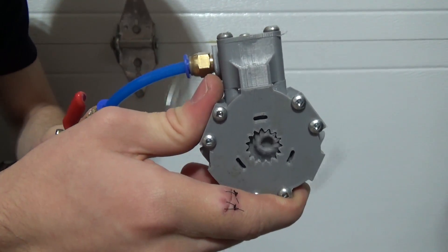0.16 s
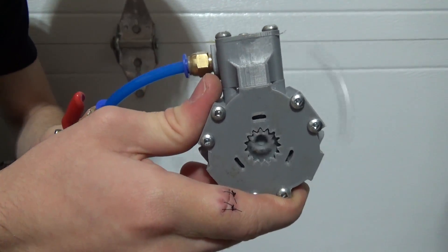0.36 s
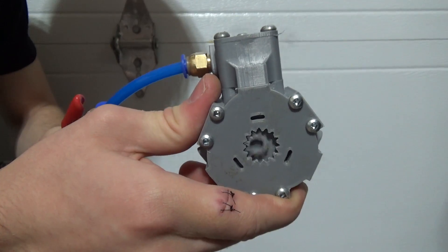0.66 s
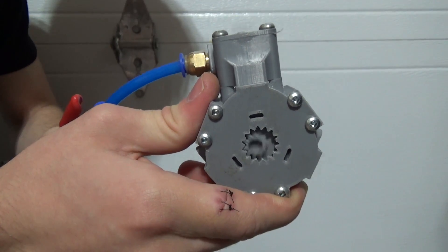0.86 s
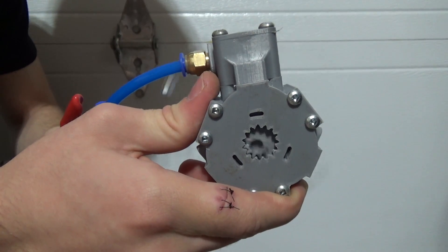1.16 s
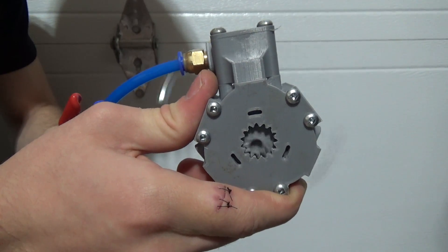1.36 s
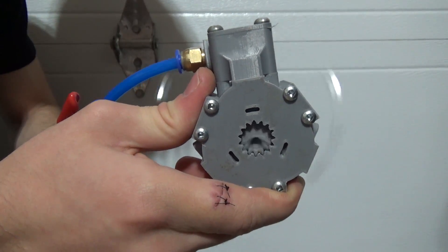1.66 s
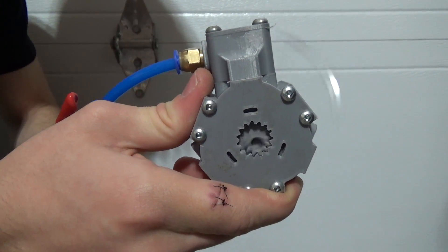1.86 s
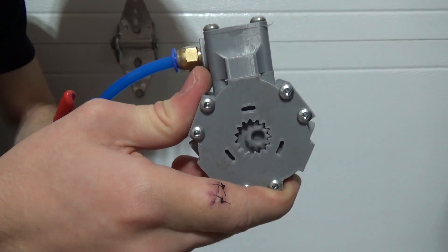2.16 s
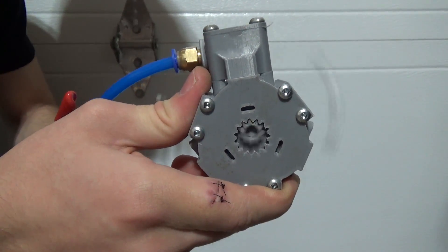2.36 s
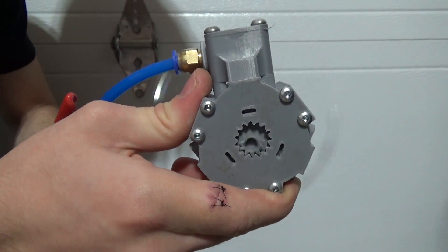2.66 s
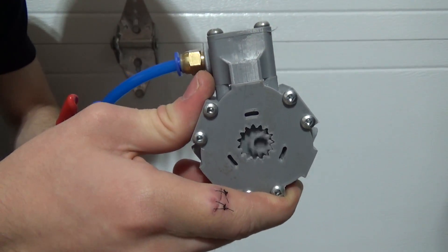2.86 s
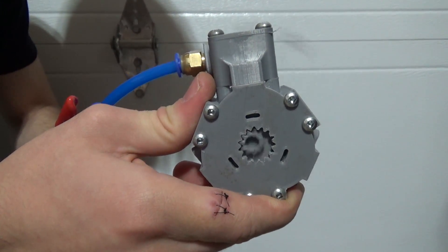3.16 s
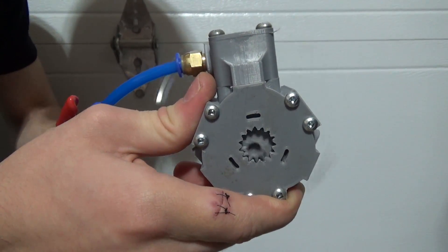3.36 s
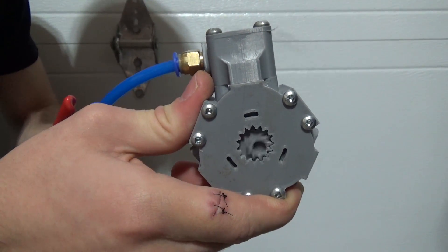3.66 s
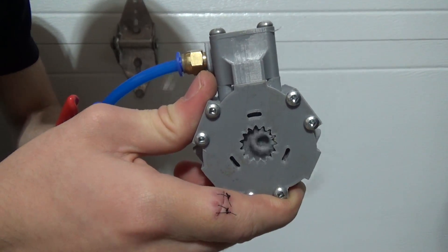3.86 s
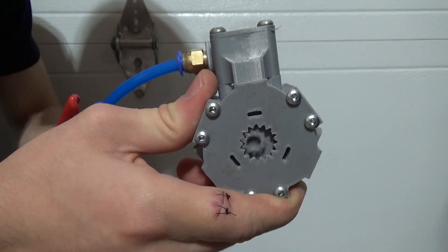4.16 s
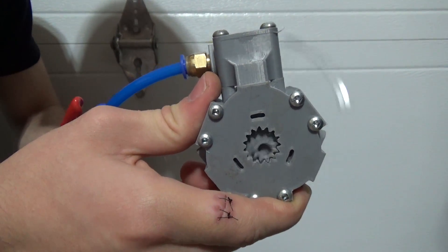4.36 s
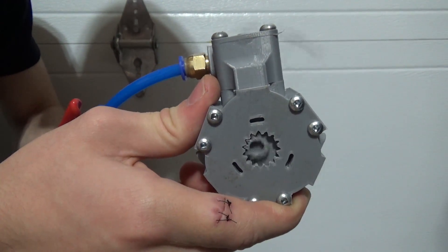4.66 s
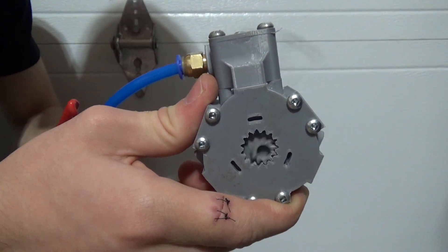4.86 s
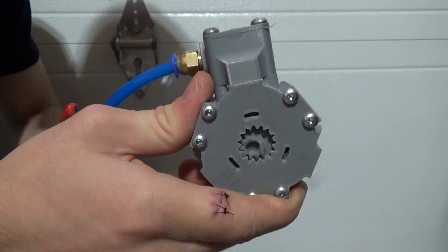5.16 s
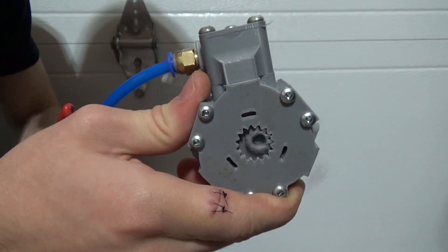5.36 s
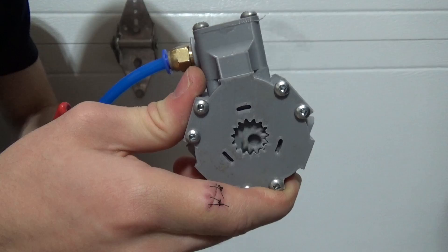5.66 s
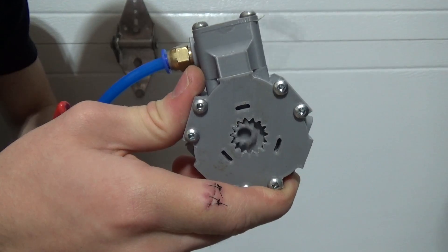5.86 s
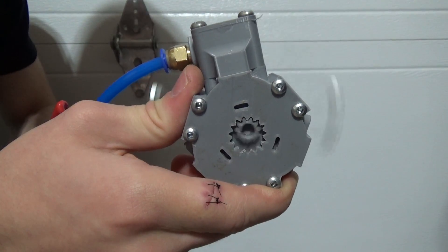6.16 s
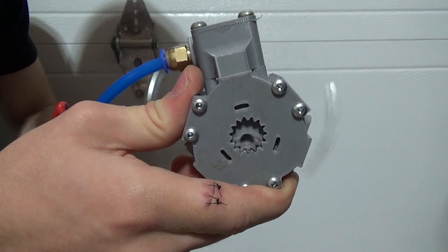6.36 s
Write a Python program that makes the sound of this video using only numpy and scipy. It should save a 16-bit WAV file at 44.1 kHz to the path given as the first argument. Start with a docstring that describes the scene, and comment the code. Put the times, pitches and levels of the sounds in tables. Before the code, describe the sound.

A small plastic rotary engine is already running on compressed air at 0 s, very close and dry. Abrupt hissing puffs follow at nearly nine a second, each lasting about half its cycle with snappy edges. They alternate: one opens with a brief raspy, hollow hoot sagging from about 700 to 550 Hz, the next is a brighter hiss. Between them thin high air leaks, hard plastic ticks and chatters around 3 kHz, and a soft rumble rolls underneath. The pace reaches nearly ten by 1-1.7 s, drops towards 8.4 at 3 s, climbs past nine at 3.75 s, then slows to about seven at 5.9 s, picking up slightly before the cut at 6.5 s. Small spits come near 0.5-1, 3.4-3.8 and 5-5.4 s; dull knocks scatter from 0.9 to 5 s, strongest near 2.2 s. Leakage swells around 2 s. Faint room noise and echo.

```python
"""A small printed-plastic rotary engine, held in the hand, idles on compressed air; its speed wanders and drops.
Two unlike exhaust puffs alternate, both jets of coloured noise gated by the port: the first starts with
a hollow honk, a gliding sine with rasp, and the second is a brighter hiss.
Between them filtered noise leaks past the rotor, whose random slips chatter and ring the housing;
it also ticks, rumbles, spits and now and then knocks, over quiet room noise and a faint echo."""
import sys
import numpy as np
from scipy import signal
from scipy.fft import rfft, irfft, next_fast_len
from scipy.io import wavfile
from scipy.ndimage import map_coordinates

SR = 44100
rng = np.random.default_rng(int(sys.argv[2]) if len(sys.argv) > 2 else 0)


def wav_out(sig):
    """Save sig, one row per channel (or a flat mono array), as 16-bit PCM at SR to the path in sys.argv[1]."""
    wavfile.write(sys.argv[1], SR, np.round(np.clip(np.atleast_2d(sig).T, -1, 1) * 32767).astype(np.int16))


N = 287532  # length [samples]

# Engine speed: (time [s], rate [puffs/s])
ENGINE_SPEED = [(0.0, 8.838), (0.866, 9.702), (1.709, 9.77), (2.467, 8.688), (2.961, 8.425), (3.747, 9.266),
                (4.598, 7.91), (5.916, 7.218), (6.5, 7.64)]
# Port timing [puff cycles]: wait for the first opening, time open, head start of every second puff
FIRST_OPENING, OPEN_SHARE, SECOND_EARLY = .1348, .454, .0283
# Puffs whose hollow note fails to speak: (puff number, counted from 0)
MUTE_PUFFS = [2, 20]

# Room noise colour: (frequency [Hz], relative density [dB per Hz])
ROOM_COLOUR = [(20, -27), (60, -9), (150, 0), (400, -5), (1500, -18), (15000, -35)]
# Air seeping past the seals as they loosen and reseat, before trim: (time [s], level [dB])
SEAL_SEEPAGE = [(0.0, -29.5), (0.51, -33.5), (1.17, -30.5), (1.48, -33), (1.86, -26), (1.97, -29.5),
                (2.2, -25), (2.3, -30.2), (2.54, -28), (3.17, -34.5), (3.6, -34), (3.84, -28), (4.08, -28),
                (4.82, -28.5), (5.07, -32.5), (5.43, -29), (5.51, -32), (6.5, -31.7)]
# Colour of the steady seep, and of the chatter's clicks: (frequency [Hz], relative density [dB per Hz])
SEEP_COLOUR = [(300, -28.5), (1100, -15.5), (1700, -9), (2900, -3), (4400, -3), (5300, -9), (6300, -1),
               (7400, -8.5), (8900, -6), (10250, 1.5), (11100, -6.5), (12100, -5.5), (13800, -19),
               (15700, -8.5)]
# Colour of the faster leak near the port: (frequency [Hz], relative density [dB per Hz])
LEAK_COLOUR = [(1000, -23), (3000, -35.5), (4400, -9), (5100, -7), (5800, 2), (7400, 4), (8100, 5),
               (9500, 8.5), (11500, -19), (12700, -7), (14500, -2), (15600, 0.5)]
# The rotor rubs at the same places of every turn: (share of the pause gone [0-1], level [dB])
RUBBING_PLACES = [(0, -47), (.2, -31.5), (.29, -33.5), (.35, -44), (.45, -35.5), (.62, -45), (.76, -29.5),
                  (.84, -29.5), (1, -26)]
# Ring of the plastic housing: (frequency [Hz], width [Hz], relative level [dB])
HOUSING_MODES = [(2667, 137, 8.5), (3190, 510, 2), (3600, 1440, -5.5)]
# Rolling load over a pair of puffs, before lumps:
# (place [0-1 first puff, 1-2 pause, 2-3 second puff, 3-4 pause], level [dB])
ROLLING_LOAD = [(0, -75), (.55, -77), (.8, -51), (1.05, -52.5), (1.35, -56.5), (1.48, -56), (1.75, -57.5),
                (2.5, -78), (3.2, -59), (4, -72)]
# Dull knocks of the rotor, before trim: (time [s], peak level [dB])
ROTOR_KNOCKS = [(0.917, -34), (1.121, -36), (1.326, -40), (1.741, -40), (2.194, -22.5), (2.605, -33),
                (2.891, -39), (3.766, -41), (3.971, -33), (4.23, -40), (4.497, -35), (4.741, -29.5),
                (4.95, -37)]
# Colour of knocks and rumble: (frequency [Hz], relative density [dB per Hz])
KNOCK_COLOUR = [(25, -44), (50, -20), (100, -2), (170, 0), (300, 0), (480, -11), (1000, -30), (3000, -60)]
# Part of the rumble that differs between the ears: (frequency [Hz], relative density [dB per Hz])
SWAY_COLOUR = [(30, -38), (60, -22), (120, -7), (300, -4), (550, -5), (1000, -9), (3000, -47)]
# Decay of the walls' answer: (frequency [Hz], fall by 60 dB [s])
GARAGE_DECAY = [(100, 0.55), (1000, 0.11), (5000, 0.7), (15000, 0.6)]
# Colour of the air jets: (frequency [Hz], relative density [dB per Hz])
JET_COLOUR = [(100, -63), (300, -23), (550, -17), (1200, -15), (1600, -8), (2400, -4), (3700, -1),
              (5100, -1), (6100, 3.5), (7500, 0), (9400, 2.5), (11200, -2.5), (13000, -5), (16000, -7)]
# Air resonances that come and go as the rotor sweeps the port, before random variation:
# (frequency [Hz], width of one pass [Hz], level in first puff [dB], level in second puff [dB],
#  strongest moment [share of puff], spread [share of puff])
CAVITY_MODES = [(613, 304, -37.5, -48.5, 0.11, 0.3), (2560, 300, -28, -33.5, 0.3, 0.13),
                (2870, 130, -26.5, -70, 0.2, 0.13), (2304, 180, -36, -36.5, 0.72, 0.19),
                (4453, 440, -31.5, -31.5, 0.58, 0.34), (6690, 1000, -30, -23, 0.27, 0.25),
                (8046, 640, -26.5, -24, 0.27, 0.36), (10070, 1430, -21.5, -21.5, 0.78, 0.16),
                (15000, 900, -38, -32.5, 0.16, 0.28)]
# Colour of the kicks and eddies at the port edges: (frequency [Hz], relative density [dB per Hz])
SLAP_COLOUR = [(30, -32), (100, -25), (200, -4), (350, 4), (700, 4.5), (2000, -1), (5000, -7.5),
               (15000, -35)]
# Colour of a hard plastic tick: (frequency [Hz], relative density [dB per Hz])
TICK_COLOUR = [(200, -26), (700, -12), (1800, 2), (3600, 7.5), (6000, -1), (10000, -5), (15000, -13)]
# The seal lets go for an instant, before trim: (time [s], peak level [dB])
SEAL_SPITS = [(0.532, -17), (0.7447, -12), (0.9512, -12), (3.3556, -11), (3.576, -13), (3.7936, -18),
              (5.02, -19), (5.401, -15)]

# Balance of the two capsules, left minus right: (frequency [Hz], level [dB])
CAPSULE_BALANCE = [(2000, 0), (5300, -.1), (6300, -1.4), (7900, 0), (9000, -2.3), (10400, -1.3),
                   (12000, -.1)]
# The left capsule's lead: (frequency [Hz], phase [radians])
CAPSULE_LEAD = [(7400, 0), (8400, -.2), (10100, .1), (12000, 0)]
LOW_CUT_HZ, TOP_HZ = 38, 15900


def amp(db):
    """Decibels to gain."""
    return 10 ** (np.asarray(db) / 20)


def unit(x):
    """Scale to rms 1."""
    return x / np.sqrt(np.mean(x ** 2) + 1e-20)


def clock():
    """Time of every sample, in seconds."""
    return np.arange(N) / SR


def along(points, hz):
    """Read (Hz, value) points on a log frequency axis."""
    f, value = np.transpose(points)
    return np.interp(np.log(hz + 1), np.log(f + 1), value)


def filtered(x, response):
    """Shape x by a response of frequency."""
    m = next_fast_len(N + SR // 2)
    spectrum = rfft(x, m) * response(np.fft.rfftfreq(m, 1 / SR))
    return irfft(spectrum, m)[..., :N]


def coloured(x, spectrum):
    """Pass x through a (Hz, dB) spectrum."""
    return filtered(x, lambda hz: amp(along(spectrum, hz)))


def resonance(f, hz, width):
    """Causal response of one mode."""
    return 1j * f * width / (hz * hz - f * f + 1j * f * width)


def wobble(rate):
    """A smooth random curve, rate knots a second."""
    knots = rng.standard_normal(int(N * rate / SR) + 4)
    return map_coordinates(knots, [np.arange(N) * rate / SR])


def rush(spectrum):
    """Turbulent noise of rms 1."""
    return unit(coloured(rng.standard_normal(N), spectrum))


def blows(times, db, spectrum):
    """Single pushes with the given colour and peak levels."""
    hits, probe = np.zeros(N), np.zeros(N)
    inside = times * SR < N - 1
    hits[(times[inside] * SR).astype(int)] = amp(db)[inside]
    probe[N // 2] = 1
    return coloured(hits, spectrum) / coloured(probe, spectrum).max()


def puffs():
    """One row per puff, (port opens s, port shuts s): the rotor uncovers the port at fixed angles."""
    t = np.arange(N + SR // 2) / SR
    cycles = np.cumsum(np.interp(t, *np.transpose(ENGINE_SPEED))) / SR
    number = np.arange(int(cycles[N] - FIRST_OPENING) + 1)
    opens = FIRST_OPENING + number - SECOND_EARLY * (number % 2)
    return np.interp(np.transpose([opens, opens + OPEN_SHARE]), cycles, t)


def rotor():
    """Per sample: puff number, share of the puff gone, share of the following pause gone."""
    edges = puffs().ravel()
    step = np.interp(clock(), edges, np.arange(len(edges)))
    puff = (step // 2).astype(int)
    return puff, np.minimum(step % 2, 1), np.maximum(step % 2 - 1, 0)


def port(rise_s, fall_s):
    """How far the exhaust port is open, 0-1, with sloping edges."""
    corners = [(a - rise_s / 2, a + rise_s / 2, b - fall_s / 2, b + fall_s / 2) for a, b in puffs()]
    return np.interp(clock(), np.ravel(corners), np.tile([0, 1, 1, 0], len(corners)))


def seal_level():
    """Seepage past the seals over time, in dB."""
    return np.interp(clock(), *np.transpose(SEAL_SEEPAGE))


def slack():
    """How much looser than usual the seals are, in dB of seepage."""
    seal_db = seal_level()
    return seal_db - seal_db.mean()


def room_noise(db, side_db):
    """Quiet noise common to both ears, plus a weaker part independent at each."""
    common = rush(ROOM_COLOUR)
    sides = np.array([rush(ROOM_COLOUR), rush(ROOM_COLOUR)])
    return amp(db) * (common + amp(side_db) * sides)


def leaks(pause, opening, seep_db, leak_db, growth, lead, widening, flutter_db):
    """Air always seeps, and escapes faster as the rotor tip nears the port; slack seals leak more and sooner."""
    slack_db = slack()
    reach = lead + widening * amp(slack_db)  # share of the pause
    nearing = np.exp(-((1 - pause) / reach) ** 4)
    seep = amp(seep_db) * rush(SEEP_COLOUR)
    leak = amp(leak_db + growth * slack_db) * nearing * (1 - opening) * rush(LEAK_COLOUR)
    return (seep + leak) * amp(seal_level() + flutter_db * wobble(110))


def chatter(puff, pause, slips_per_s, scatter_db, click_db, after_second_db):
    """Where the rotor rubs it moves in tiny slips that click and ring the housing."""
    size = rng.uniform(-1, 1, N)
    happens = rng.random(N) < slips_per_s / SR
    slips = happens * np.sign(rng.standard_normal(N)) * amp(scatter_db * size)

    def housing(f):
        """Sum of the housing's modes with alternating signs."""
        modes = enumerate(HOUSING_MODES)
        return sum((-1) ** k * amp(db) * resonance(f, hz, width) for k, (hz, width, db) in modes)

    ring = unit(filtered(slips, housing))
    click = unit(coloured(slips, SEEP_COLOUR))
    rub_db = np.interp(pause, *np.transpose(RUBBING_PLACES)) + after_second_db * (puff % 2)
    return (ring + amp(click_db) * click) * amp(rub_db)


def rumble(puff, swept, pause, knock_db, shudder_db, shudder_s, lumps_db, side_db):
    """The off-centre rotor rolls heavily late in each first puff and sometimes knocks, shaking the body."""
    place = 2 * (puff % 2) + swept + pause
    load = amp(np.interp(place, *np.transpose(ROLLING_LOAD)))
    load = load * unit(amp(lumps_db * np.tanh(wobble(70))))
    for s, db in ROTOR_KNOCKS:
        load += amp(db + shudder_db) * np.exp(-((clock() - s - shudder_s) / shudder_s) ** 2)
    s, db = np.transpose(ROTOR_KNOCKS)
    knock = blows(s + 0.0043, db + knock_db, KNOCK_COLOUR)
    sway = amp(side_db) * rush(SWAY_COLOUR) * np.array([[1], [-1]])  # opposite at the two ears
    return knock + load * (rush(KNOCK_COLOUR) + sway)


def garage(x):
    """A faint diffuse answer of the walls: decaying noise, different at each ear."""
    hz, t, z = signal.stft(rng.standard_normal((2, SR // 3)), SR, nperseg=256)
    decay = amp(-60 * t / along(GARAGE_DECAY, hz)[:, None])
    tail = signal.istft(z * decay, SR, nperseg=256)[1]
    return signal.fftconvolve(x[None], tail / np.linalg.norm(tail[0]), axes=1)[:, :N]


def exhaust(puff, swept, opening, first_db, second_db, flutter_db, rough_db, vary_db):
    """A jet blows while the port is open; the chamber behind it changes shape and colour."""
    second = (puff % 2 == 1) | np.isin(puff, MUTE_PUFFS)  # a mute puff only hisses, like a second one
    air = amp(np.where(second, second_db, first_db)) * rush(JET_COLOUR)
    for hz, width, db_first, db_second, moment, spread in CAVITY_MODES:
        ring = unit(filtered(rng.standard_normal(N), lambda f: resonance(f, hz, width) ** 2))
        level_db = np.where(second, db_second, db_first) + vary_db * np.tanh(wobble(25))
        swell = np.exp(-((swept - moment) / spread) ** 2 / 2)
        air += ring * amp(level_db) * swell
    turbulence = unit(amp(flutter_db * wobble(130) + rough_db * wobble(1500)))
    return air * opening * turbulence


def puff_balance(swept, db, share):
    """Left and right gains: the start of each puff is a little louder on the right."""
    return 1 + amp(db) * np.exp(-(swept / share) ** 4) * np.array([[-1], [1]])


def honk(puff, swept, db, start_hz, end_hz, glide, crest, waver, flutter_db, rasp_db, grit_db, bleed):
    """The first chamber sounds like a blown bottle: a raspy, sagging note, weaker when the seals leak."""
    # glide and crest are shares of the puff
    hz = end_hz + (start_hz - end_hz) * np.exp(-swept / glide)
    hz = hz * (1 + waver * wobble(170))
    speaks = (puff % 2 == 0) & ~np.isin(puff, MUTE_PUFFS)
    swell = swept / crest * np.exp(1 - swept / crest) * (1 - swept ** 2)
    swell = swell * speaks * amp(-bleed * slack())
    note = amp(flutter_db * np.tanh(wobble(220))) * np.sin(2 * np.pi * np.cumsum(hz) / SR)
    grit = rng.standard_normal(N) * amp(grit_db * np.tanh(wobble(900)))
    rasp = unit(coloured(grit, [(400, -36), (900, 6), (3200, 5.0), (6000, -13)]))
    return swell * (amp(db) * note + amp(rasp_db) * rasp)


def slaps(open_db, shut_db, scatter_db, eddy_s, eddy_db):
    """The flow starts and stops abruptly: a pressure kick and a brief eddy at each edge of the port."""
    times = puffs().ravel()
    size = rng.uniform(-1, 1, len(times))
    db = np.tile([open_db, shut_db], len(times) // 2) + scatter_db * size
    t = clock()
    nearest = np.searchsorted((times[1:] + times[:-1]) / 2, t)
    age = np.maximum(t - times[nearest], 0) / eddy_s
    eddy = amp(db[nearest] + eddy_db) * age * np.exp(1 - age)
    return blows(times, db, SLAP_COLOUR) + eddy * rush(SLAP_COLOUR)


def ticks(db, scatter_db, place, stray, decay_s):
    """Partway through each pause the rotor rocks over in its housing with a dry tick."""
    opens, shuts = puffs().T
    chance = rng.uniform(-1, 1, (len(opens) - 1, 2))  # columns: timing, loudness
    times = shuts[:-1] + (place + stray * chance[:, 0]) * (opens[1:] - shuts[:-1])
    t = clock()
    last = np.maximum(np.searchsorted(times, t) - 1, 0)
    age = t - times[last]
    envelope = (age > 0) * np.exp(-np.abs(age) / decay_s)
    return amp(db + scatter_db * chance[last, 1]) * envelope * rush(TICK_COLOUR)


def spits(gain_db, peak_s, ring_db):
    """Very short jets through the seal, with a ring near the housing's pitch."""
    burst = np.zeros(N)
    for s, db in SEAL_SPITS:
        age = np.clip((clock() - s) / peak_s, 0, 20)
        burst += amp(db + gain_db) * age * np.exp(1 - age)
    ring = unit(filtered(rng.standard_normal(N), lambda f: resonance(f, 3400, 900) ** 2))
    return burst * (rush(JET_COLOUR) + amp(ring_db) * ring)


def scene():
    """The engine close to the microphone, over quiet room noise."""
    puff, swept, pause = rotor()
    opening = port(rise_s=0.0021, fall_s=0.0023)
    noise = room_noise(db=-71, side_db=-19)
    body = leaks(pause, opening, seep_db=0.64, leak_db=5.0, growth=.3, lead=.2, widening=.15, flutter_db=1.0)
    body += chatter(puff, pause, slips_per_s=300, scatter_db=7.5, click_db=-15.0, after_second_db=-1.5)
    low = rumble(puff, swept, pause, knock_db=-2, shudder_db=-10, shudder_s=.006, lumps_db=5, side_db=-2)
    jet = exhaust(puff, swept, opening, first_db=-18.5, second_db=-18.5,
                  flutter_db=0.73, rough_db=0.33, vary_db=2.5)
    body += honk(puff, swept, db=-32.5, start_hz=695, end_hz=550.7, glide=.15, crest=0.19, waver=0.085,
                 flutter_db=3, rasp_db=-34.0, grit_db=11.0, bleed=.4)
    body += slaps(open_db=-22.5, shut_db=-22.0, scatter_db=6.5, eddy_s=0.001, eddy_db=-15.0)
    body += ticks(db=-21.5, scatter_db=5, place=.4, stray=.05, decay_s=.0012)
    body += spits(gain_db=-8, peak_s=.0012, ring_db=-3)
    echo = amp(-30.5) * garage(jet + body)
    return jet * puff_balance(swept, db=-27, share=.42) + body + echo + low + noise


def record(dry):
    """The capsules differ a little in the treble; deep bass is cut and nothing passes the band limit."""
    def capsules(hz):
        """Left and right responses, each taking half of the mismatch."""
        mismatch = amp(along(CAPSULE_BALANCE, hz) / 2) * np.exp(1j * along(CAPSULE_LEAD, hz) / 2)
        band = hz ** 2 / (hz ** 2 + LOW_CUT_HZ ** 2) * (hz < TOP_HZ)
        return np.array([mismatch, 1 / mismatch]) * band

    return filtered(dry, capsules)


dry = scene()
out = record(dry)
wav_out(out)
```